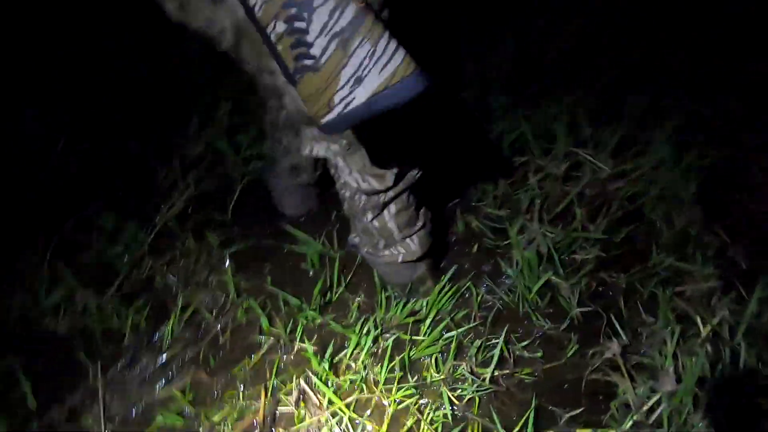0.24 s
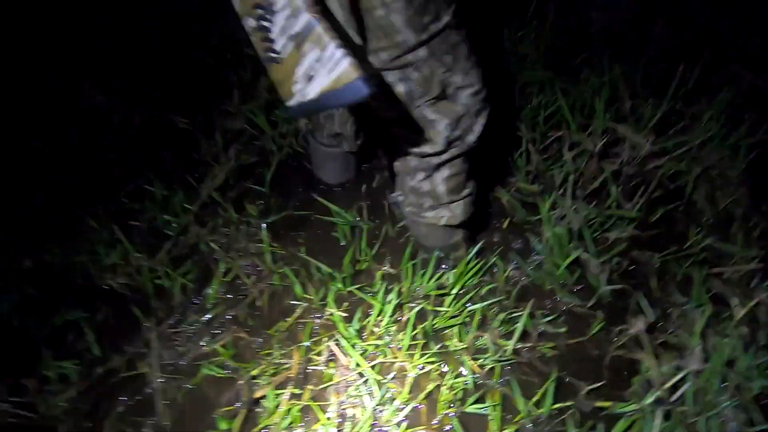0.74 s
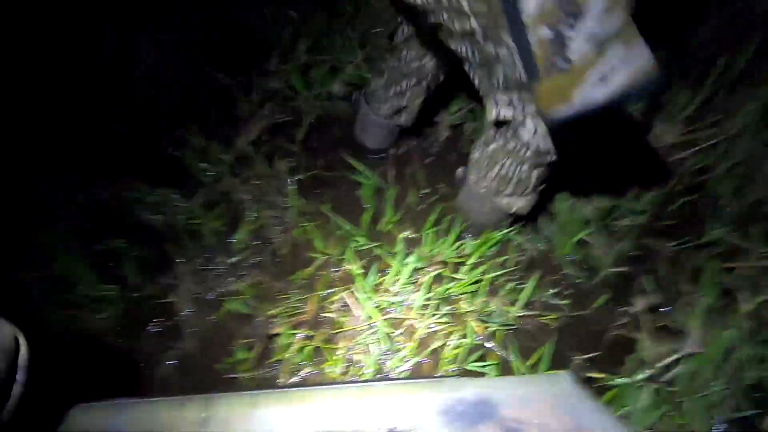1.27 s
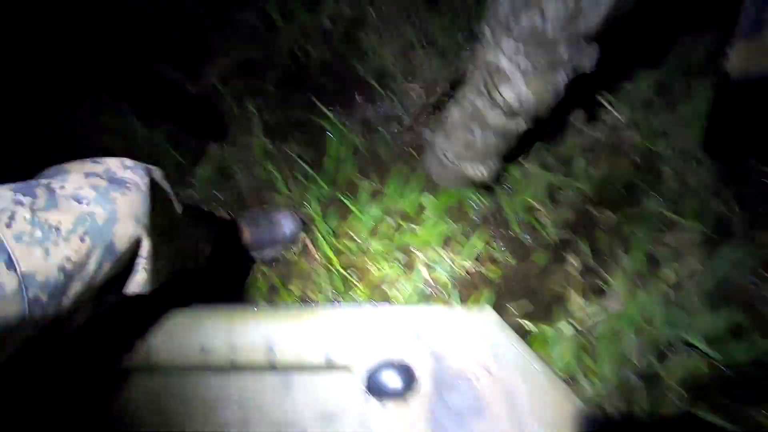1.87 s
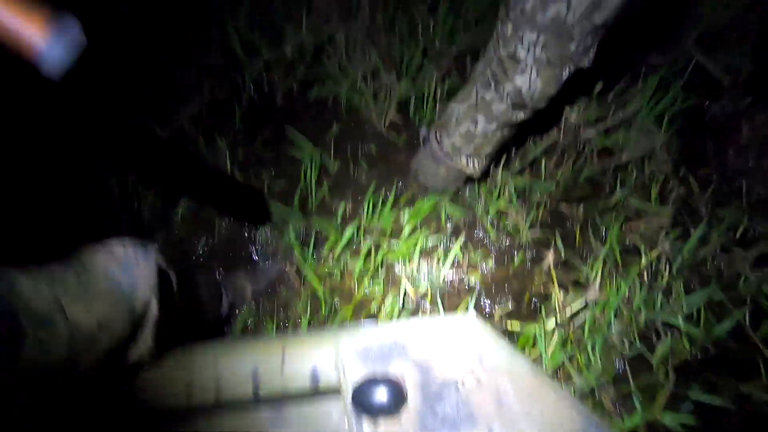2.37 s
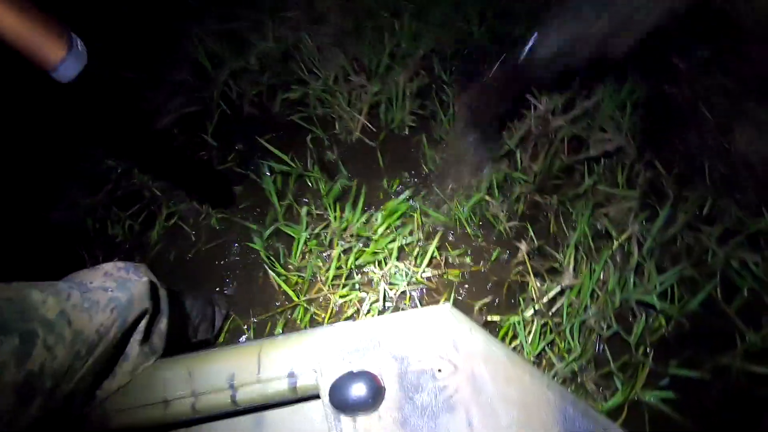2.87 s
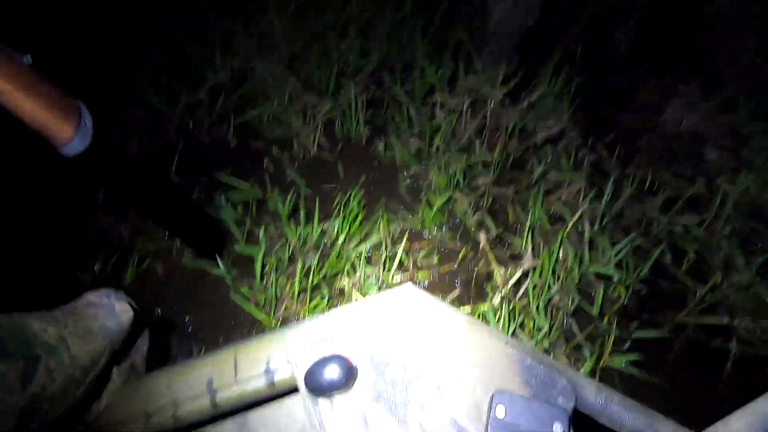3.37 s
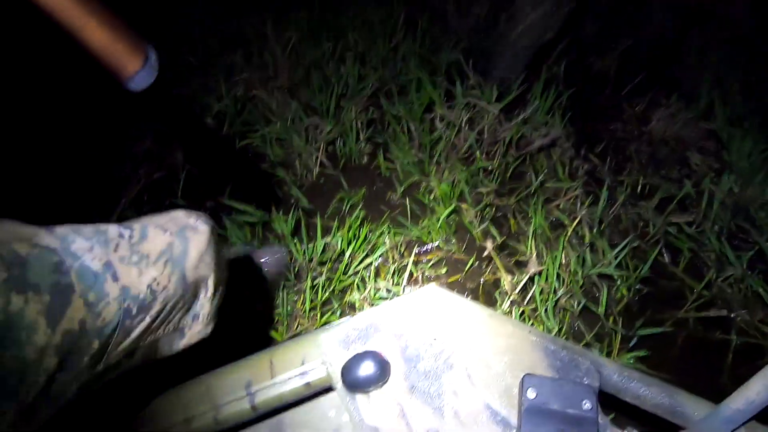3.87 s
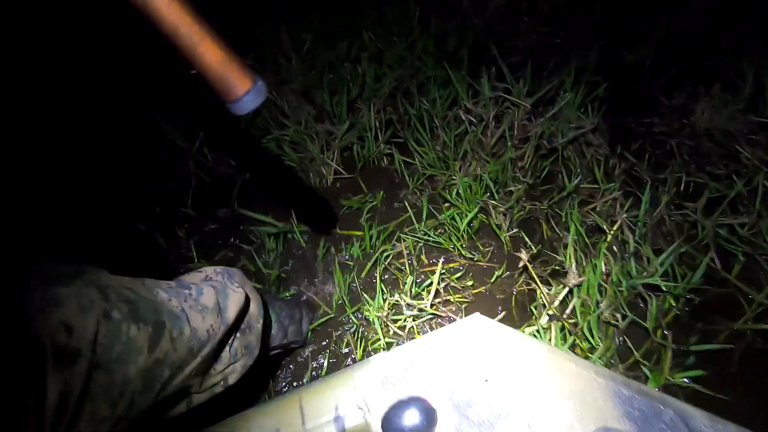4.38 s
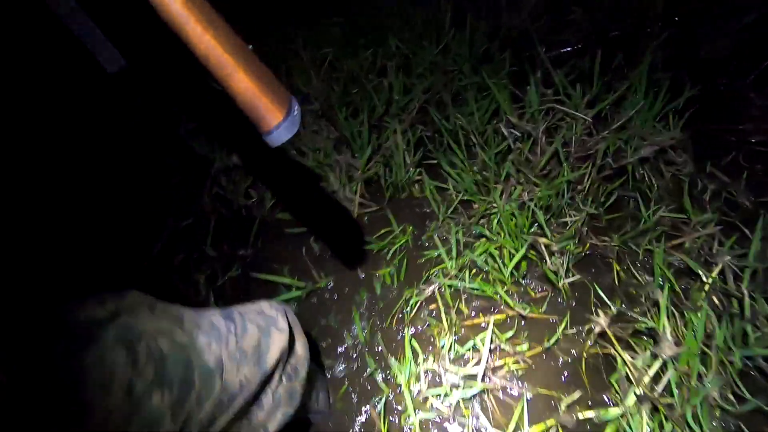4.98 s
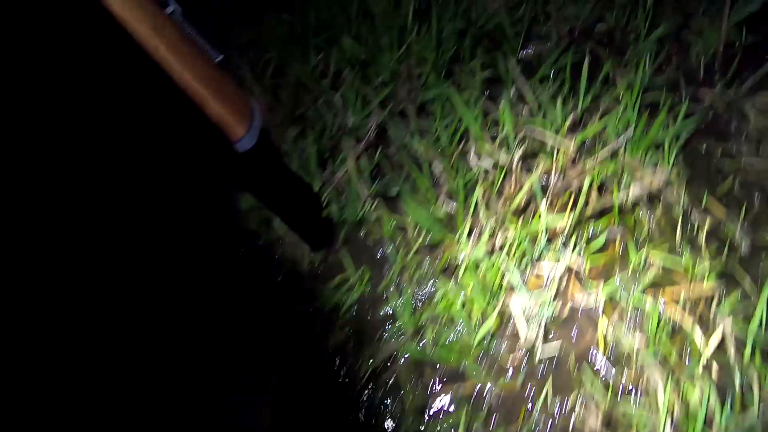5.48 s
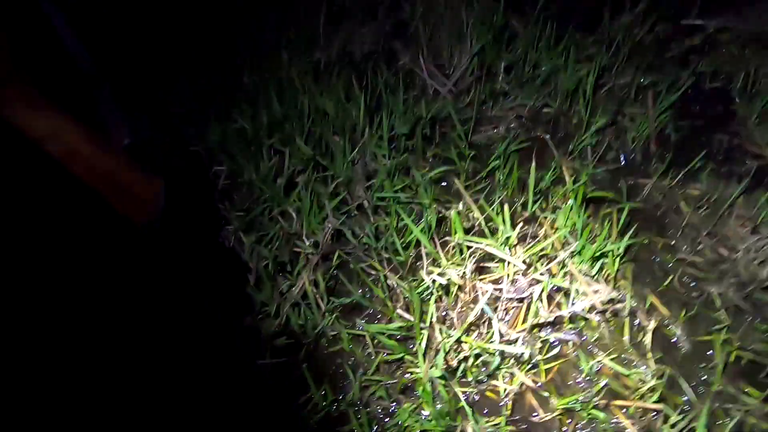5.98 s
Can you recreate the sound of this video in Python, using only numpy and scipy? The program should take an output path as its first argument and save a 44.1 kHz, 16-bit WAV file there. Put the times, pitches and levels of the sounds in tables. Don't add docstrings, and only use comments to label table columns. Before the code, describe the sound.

Close, slow wading through flooded grass outdoors at night. Quiet bubbling and a heavy muffled thud come first, then a crisp cluster of splashes around two seconds. More splashy steps follow at three and four seconds, with drips between. Later grass swishes along the boots in a wetter, brushier step. A body-worn microphone adds low rumble and knocks.

```python
import sys
import numpy as np
from scipy import signal
from scipy.fft import rfft, irfft
from scipy.io import wavfile
from scipy.ndimage import uniform_filter1d

SR = 44100
rng = np.random.default_rng(int(sys.argv[2]) if len(sys.argv) > 2 else 0)


def gain_from_decibels(decibels):
    exponent = np.asarray(decibels, float) / 20
    return 10 ** exponent


def to_wav(s):
    ch = np.atleast_2d(s).T
    pcm = np.round(np.clip(ch, -1, 1) * 32767)
    wavfile.write(sys.argv[1], SR, pcm.astype(np.int16))


N = 274743

# frequency in Hz, density in dB per Hz.
SPLASH_SPECTRUM = [(250, -28), (420, 3), (488, 2.5), (641, 2.5), (816, -3), (1140, -4), (2110, -5),
                   (2860, -4.5), (5990, -11.5), (10600, -16.5), (13500, -27.5), (15500, -32)]
# time of peak in seconds, peak in dB, rise in seconds,
# fall in seconds, depth (slosh against splash) in dB.
SURGES = [(0.24, -45, 4.9, 0.25, -18), (0.421, -43.5, 0.011, 0.079, 6), (0.85, -50.5, 1, 0.66, -4),
          (1.65, -42.5, 0.66, 0.066, -1), (1.72, -33.5, 0.1, 0.24, -10), (1.79, -33, 0.13, 0.18, -6),
          (1.89, -35.5, 0.078, 0.077, -34), (1.934, -32, 0.022, 0.08, -10), (1.98, -35.5, .1, 0.54, -17),
          (2.087, -31.5, 0.08, 0.031, -20), (2.13, -23, 0.04, 0.086, -12), (2.17, -27, 0.12, 0.055, -23),
          (2.225, -35, 0.08, 0.089, -5), (2.262, -31.5, 0.039, 0.044, -4),
          (2.308, -30.5, 0.056, 0.061, -16.5), (2.38, -31, 0.042, 0.061, -25),
          (2.43, -47, 0.074, 0.22, 1.5), (2.56, -47.5, 0.15, 0.3, -1), (2.7, -44, 0.3, 0.24, -17),
          (2.9, -35.5, 0.15, 0.2, -19), (2.98, -32, 0.16, 0.27, -11.5), (3.045, -34.5, 0.074, .06, -18),
          (3.17, -40.5, 0.25, 0.25, -37), (3.245, -39, 0.06, 0.18, -23), (3.309, -42, 0.021, 0.25, -3.5),
          (3.4, -29.5, 0.086, 0.21, -15), (3.54, -39.5, 0.099, 0.063, 13.5), (3.77, -43, 0.18, 0.085, -1.5),
          (3.86, -36.5, 0.036, 0.88, -6), (4.092, -25, 0.082, 0.22, -21), (4.15, -28.5, .06, 0.23, -21),
          (4.25, -42.5, 0.056, 0.31, 2.5), (4.36, -37, 0.22, 0.45, -7), (4.86, -43.5, 0.45, 0.54, -4.5),
          (5.55, -32, 0.19, 0.19, -6), (5.77, -39, 0.088, 0.11, -15), (6.07, -38, 0.2, 0.35, -6.5)]
# time of peak in seconds, peak in dB,
# rise in seconds, fall in seconds.
SWISHES = [
    (1.55, -46.5, 0.12, 0.24),
    (3.32, -36, 0.038, 0.16),
    (3.7, -55.5, 0.33, 0.49),
    (4.66, -44, 0.56, 0.37),
    (5.25, -52.5, 1, 0.28),
    (5.58, -40, 0.12, .2),
    (5.69, -37, 0.26, 0.064),
    (5.87, -43.5, 0.29, 0.72),
    (6.07, -65, 0.21, 0.48),
]
SPAN_DB = 20
SEEP_DB, SEEP_DEPTH_DB, SEEP_TOP_DB = -68.5, 2, -32
SPRAY_DB, DULLING = -20, 0.13
SWISH_TOP_DB = -13

# start in seconds, peak in dB, pitch in Hz, 60 dB decay in seconds.
PLOPS = [(0.153, -21.5, 432, 0.03), (0.243, -26.5, 650, 0.042), (0.416, -33, 438, 0.13),
         (0.25, -36, 1050, .04), (0.414, -38, 840, 0.08), (0.837, -23, 474, 0.025),
         (1.688, -34, 1260, 0.061), (1.706, -26.5, 980, 0.047), (1.99, -29.5, 1370, 0.044),
         (2.118, -31, 495, 0.038), (2.138, -30, 1200, 0.036), (2.193, -26.5, 572, 0.086),
         (2.262, -21, 410, 0.017), (2.295, -29, 434, 0.029), (2.506, -31, 390, 0.067),
         (2.856, -29, 1115, 0.021), (2.966, -22, 975, 0.024), (2.988, -23.5, 1000, 0.028),
         (3.773, -27.5, 720, 0.016), (3.495, -30, 640, 0.066), (4.023, -21, 644, 0.062),
         (4.249, -23.5, 1030, 0.039), (4.303, -15.5, 635, 0.021), (4.409, -25.5, 600, 0.027),
         (4.853, -30.5, 627, 0.042), (5.471, -29, 1340, 0.034), (5.496, -26, 984, 0.027),
         (5.524, -13.5, 600, 0.013), (5.644, -23.5, 556, 0.029), (5.794, -33, 630, 0.03),
         (6.052, -22, 580, 0.0071), (0.002, -31, 485, 0.051), (0.18, -26.5, 518, 0.061),
         (1.515, -34.5, 500, 0.088), (1.722, -24, 705, 0.026), (1.76, -27, 613, 0.073),
         (2.21, -24, 826, 0.016), (2.403, -30, 514, 0.027), (3.0, -33, 790, 0.035),
         (3.027, -31, 568, 0.045), (3.396, -20.5, 477, 0.021), (3.96, -28.5, 420, 0.066),
         (4.073, -25.5, 765, 0.036), (4.106, -22.5, 1060, 0.042), (4.325, -26, 606, 0.055),
         (4.836, -35, 690, 0.034), (5.575, -32, 690, 0.037)]
PLOP_RISE_S = 0.0019
# start in seconds, peak in dB, pitch in Hz, 60 dB decay in seconds.
SPLATS = [(1.385, -27.5, 2320, 0.084), (1.7059, -23.5, 1750, 0.056), (1.7399, -22, 1480, 0.011),
          (1.873, -20.5, 1520, 0.048), (1.929, -19.5, 3080, 0.03), (1.9622, -19, 2380, 0.057),
          (2.087, -28, 2700, 0.028), (2.1066, -16.5, 2600, 0.17), (2.26, -20, 2680, 0.035),
          (2.3052, -13.5, 2530, 0.03), (2.3664, -22.5, 2830, 0.13), (2.85, -20, 2800, .042),
          (2.8838, -13.5, 1950, 0.028), (2.9571, -22, 1160, 0.016), (2.9783, -11.5, 2470, 0.03),
          (3.3162, -16, 3440, 0.018), (3.3353, -18, 3700, 0.03), (3.3929, -23, 2600, 0.087),
          (3.7723, -23, 1330, 0.017), (3.8444, -43, 1280, 0.045), (3.928, -23, 2860, 0.021),
          (4.0497, -10.5, 3500, 0.037), (4.0987, -12, 2700, 0.028), (4.8531, -16, 1250, 0.0075),
          (5.474, -19, 1400, 0.026), (5.5528, -20.5, 1740, 0.067), (5.817, -24, 2650, 0.082),
          (5.8316, -19, 2840, 0.088)]
# start in seconds, peak in dB, pitch in Hz.
DRIPS = [(0.156, -31, 3300), (0.414, -30.5, 1370), (2.064, -28, 2830), (2.506, -26, 980),
         (2.574, -25, 2600), (1.146, -37, 3020), (3.1168, -25, 2950), (3.119, -21.5, 1530),
         (3.158, -26, 1530), (3.2053, -21.5, 3200), (3.271, -20.5, 3220), (3.981, -28, 2130),
         (4.3143, -21, 1960), (4.371, -29, 2050), (4.409, -25, 4140), (4.505, -24.5, 1250),
         (4.533, -23, 2930), (4.571, -33, 2500), (4.635, -28, 3420), (5.037, -25.5, 1580),
         (5.453, -22, 1500), (5.594, -21, 3560), (5.528, -24.5, 5000), (6.0208, -23.5, 1580),
         (6.167, -26, 2640)]
# start in seconds, peak in dB, pitch in Hz,
# 60 dB decay in seconds.
SPATTERS = [(0.86, -35, 1900, .04), (0.897, -48, 6500, .015), (1.374, -29, 660, 0.097),
            (1.764, -24, 1510, .04), (1.802, -20.5, 2800, 0.027), (1.84, -27, 3800, 0.017),
            (1.8916, -28, 5130, 0.019), (1.977, -27, 2870, 0.021), (1.9895, -22.5, 1600, .04),
            (2.007, -30, 1800, 0.017), (2.026, -30, 7440, 0.026), (2.1177, -10.5, 2820, 0.14),
            (2.142, -17, 1930, 0.028), (2.181, -17, 2200, .03), (2.225, -23, 3670, .03),
            (2.28, -32, 9900, 0.023), (2.3526, -42, 7810, .015), (2.556, -43, 10500, .015),
            (2.7985, -35, 6350, .012), (2.8208, -22.5, 2540, 0.044), (2.827, -40, 8800, .015),
            (2.885, -30, 1980, 0.018), (2.897, -16, 1800, 0.035), (3.011, -25, 1470, 0.027),
            (3.052, -19, 2580, 0.011), (3.174, -20, 1560, 0.037), (3.406, -14.5, 3100, 0.024),
            (3.446, -25, 2970, .02), (3.85, -23.5, 1270, 0.046), (4.034, -18, 1190, 0.076),
            (4.0706, -33, 2200, 0.031), (4.141, -18, 3350, 0.043), (4.247, -26, 6500, .012),
            (4.351, -20.5, 1510, 0.036), (4.4418, -30.5, 6890, 0.016), (4.468, -26.5, 1110, .02),
            (4.499, -25, 4660, 0.018), (4.604, -31, 2500, 0.012), (4.836, -30, 1470, 0.031),
            (4.8858, -26, 4140, 0.029), (5.055, -31, 5500, .02), (5.769, -31, 4760, .03),
            (5.872, -27, 3280, 0.011), (6.081, -27, 3900, 0.018), (6.1439, -52, 5240, .02),
            (0.529, -41, 1210, 0.022), (1.334, -37, 497, 0.03), (4.534, -34, 10900, .015),
            (1.01, -45, 606, 0.034)]
SPLAT_WIDTH, DRIP_WIDTH, SPATTER_WIDTH = 0.83, 0.98, 0.62
DRIP_T60_S = 0.036
TICK_DB, TICK_S = -24.5, 0.00042
LOW_DULL_DB = 2.5
# start in seconds, peak in dB, pitch in Hz.
SNAPS = [(0.2489, -32, 1680), (1.4874, -34, 2570), (1.7069, -26, 1770), (1.741, -19, 1600),
         (1.7534, -33, 3300), (1.7981, -27, 1600), (2.0103, -32, 2540), (2.067, -28, 2200),
         (2.087, -29, 2880), (2.1063, -20, 2150), (2.2959, -25.5, 1100), (2.6893, -28.5, 2970),
         (2.8822, -25, 1940), (2.9801, -20, 2240), (3.01, -33, 2750), (3.1182, -28.5, 2800),
         (3.3094, -24, 3400), (3.7736, -25, 1590), (4.0034, -24, 2300), (4.5725, -25, 2370),
         (5.6295, -39, 3230), (1.9288, -27, 3000), (3.9303, -24, 2840), (4.4191, -25, 1100),
         (4.6363, -30, 2750)]
SNAP_RISE_S, SNAP_T60_S = 0.0001, 0.004

# start in seconds, length in seconds,
# first pitch in Hz, last pitch in Hz, level in dB.
SQUEAKS = [(0.011, 0.0037, 1160, 1170, -32), (.012, 0.0073, 2230, 2320, -38),
           (0.082, 0.53, 3090, 2904, -55), (0.413, 0.0073, 3800, 3700, -38.5),
           (0.553, 0.0069, 5670, 5640, -48.5), (1.27, 0.16, 2685, 2650, -52),
           (1.518, .14, 2586, 2760, -50.5), (3.634, 0.142, 2060, 1940, -51), (3.839, 0.012, 680, 1940, -37),
           (4.974, 0.048, 780, 2940, -47.5), (5.371, 0.011, 3840, 3580, -41),
           (5.59, 0.056, 617, 960, -41.5), (5.725, 0.026, 900, 1400, -47), (5.937, 0.023, 1365, 2680, -41),
           (5.947, 0.026, 910, 1320, -49), (6.062, 0.057, 2240, 2260, -42)]
WAVER = 0.16

# start in seconds, peak in dB,
# low note in Hz, upper note in dB against it, 60 dB decay in seconds.
KNOCKS = [(0.175, -28.5, 182, 3, 0.058), (0.246, -11, 162.2, -7, 0.19), (0.417, -38, 164, -4.5, 0.16),
          (0.482, -28, 188, -28, 0.064), (0.581, -33, 186.7, -14, 0.53), (0.61, -25, 175, -11, 0.14),
          (1.669, -21, 150.7, -15, 0.185), (2.414, -42.5, 203, 5, 0.19), (3.445, -13.5, 165, -30, 0.057),
          (3.557, -13.5, 155.5, -17, 0.16), (3.777, -44.5, 149, 10, 0.068), (4.63, -31, 94.5, -4, 0.051),
          (4.802, -22.5, 117.5, -12.5, 0.17), (5.399, -32.5, 122, -4.5, 0.82), (5.653, -18, 167.5, -3, 0.2),
          (5.794, -16.5, 106, -5.5, 0.11), (6.109, -28.5, 151, -6, 0.068), (6.156, -17.5, 100, -26, 0.035)]
# start in seconds, peak in dB, pitch in Hz, 60 dB decay in seconds.
THUDS = [(0.304, -18.5, 162.5, 0.11), (0.526, -32, 200, 0.063), (0.76, -21, 187, 0.033),
         (0.837, -0.5, 157, 0.14), (0.882, -11, 129.5, 0.12), (0.979, -23, 88.5, 0.048),
         (1.005, -19.5, 163, 0.15), (1.031, -16, 105, 0.067), (1.765, -27.5, 95, 0.071),
         (2.502, -30, 109.4, 0.24), (3.418, -12, 118, 0.093), (4.667, -25, 96.9, 0.043),
         (4.712, -30.5, 103, 0.16), (5.587, -21, 91.5, 0.1), (5.672, -11.5, 124, 0.25),
         (5.825, -24, 254, 0.17), (5.748, -20.5, 112.7, 0.48), (0.133, -30, 240, .06),
         (1.515, -37, 210, 0.11), (1.59, -34, 181, 0.13), (1.932, -32.5, 170, 0.072),
         (2.125, -33, 199, 0.11), (2.59, -37, 235, 0.045), (2.703, -42, 190, 0.16), (2.854, -36, 98, 0.099),
         (1.155, -39, 128, 0.14), (5.005, -29.5, 100, .1), (5.27, -32, 111, 0.16), (4.076, -32, 222, 0.12),
         (4.149, -33, 230, 0.07), (4.33, -30.5, 171, 0.045), (4.809, -29, 285, 0.14),
         (6.17, -32, 280, 0.058), (5.657, -22.5, 328, 0.065), (5.796, -20.5, 346, 0.055),
         (1.579, -35.5, 337, .08)]
# start in seconds, peak in dB, low note in Hz, upper note in dB against it,
# 60 dB decay in seconds.
SHOVES = [
    (0.817, -14.5, 143, -17, 0.26),
    (1.375, -24.5, 159.8, -7, 0.17),
    (3.509, -16, 161.6, -41, 0.2),
    (5.799, -20, 217.5, 5, 0.096),
    (5.905, -27, 224, 0, 0.2),
]
KNOCK_RISE_S, THUD_RISE_S, SHOVE_RISE_S = 0.0017, 0.0031, 0.021
THUD_UPPER_DB = -23
UPPER_HZ, THIRD_HZ = 255, 346.4
# frequency in Hz, density in dB per Hz.
RATTLE_SPECTRUM = [(200, -22), (330, 1.5), (650, -4.5), (1300, -19.5), (3000, -33), (12000, -66)]
RATTLE_RISE_S, RATTLE_T60_S = 0.0044, 0.16
# time in seconds, level in dB.
HANDLING = [(0.0, -40), (0.57, -50), (1.18, -56), (1.39, -39.5), (1.49, -47), (1.68, -43.5), (2.5, -49),
            (2.67, -48), (3.19, -56), (3.54, -31), (3.66, -48.5), (4.25, -51.5), (4.53, -57.5),
            (4.84, -45.5), (5.18, -49), (5.4, -42), (5.85, -34.5), (6.23, -42.5)]
# frequency in Hz, width in Hz, level in dB.
HOUSING_MODES = [(122, 67, -2.5), (164, 28, 2), (251.3, 130, -3.5), (363.5, 27, -7.5), (504, 210, -14.5)]
# time of peak in seconds, peak in dB, rise in seconds.
BUFFETS = [(0.0, -43, .3), (0.21, -34.5, 0.46), (0.85, -33, 0.57), (1.0, -35, .15), (1.39, -53, 0.44),
           (1.68, -32.5, 0.1), (1.95, -38.5, 0.98), (2.2, -41.5, 0.1), (2.53, -38, 0.37),
           (2.71, -33, 0.045), (2.95, -37.5, 0.45), (3.3, -34, 0.079), (3.5, -48, .3), (3.748, -39, 0.039),
           (4.34, -38, 0.3), (4.67, -35, 0.044), (4.84, -41, 0.63), (5.05, -51, 0.35), (5.33, -42, 0.76),
           (5.6, -32.5, 0.091), (5.85, -44, 0.33), (6.03, -37, 0.33), (6.18, -39, 0.26)]
BUFFET_FALL_S, CALM_DB = 0.24, -68
# frequency in Hz, density in dB per Hz.
RUMBLE_SPECTRUM = [(10, -10), (25, 9.5), (50, 8), (80, 3), (110, -58), (200, -71)]

# frequency in Hz, density in dB per Hz.
NIGHT_SPECTRUM = [(180, -43), (300, -7), (600, -0.5), (1000, -14.5), (3000, -14), (4300, -6), (6000, -25),
                  (11400, -30.5), (14000, -62.5)]
NIGHT_DB = -60.5
# frequency in Hz, width in Hz, level in dB.
CAVITY_MODES = [(635, 60, -15.5), (1710, 24, -7.5), (2800, 150, -17.5), (3620, 65, -16), (8160, 220, -4)]
TOP_HZ = 14800


def wading():
    hz, t, z = signal.stft(water_texture(), SR, nperseg=512)
    patches = uniform_filter1d(rng.standard_normal(z.T.shape), size=5, axis=0)
    patches = evened(uniform_filter1d(patches, size=9, axis=1)).T

    s, db, rise, fall, deep_db = np.transpose(SURGES)
    water_db = swells(t, SEEP_DB, s, db, rise, fall)
    blades_db = swells(t, 2 * SEEP_DB, *np.transpose(SWISHES))
    force_db = 10 * np.log10(gain_from_decibels(2 * water_db) + gain_from_decibels(2 * blades_db))
    depth_db = swells(t, SEEP_DB + SEEP_DEPTH_DB, s, db + deep_db, rise, fall) - force_db
    spray_db = swells(t, SEEP_DB + SEEP_TOP_DB, s, db + SPRAY_DB - DULLING * deep_db, rise, fall)
    bright_db = 10 * np.log10(gain_from_decibels(2 * spray_db) + gain_from_decibels(2 * (blades_db + SWISH_TOP_DB))) - force_db

    top = np.clip(np.log2(hz / 3500 + 1e-9) / 0.79, 0, 1.5)[:, None]
    bottom = np.clip(np.log2(1300 / (hz + 1)) / 1.47, 0, 1)[:, None]
    z = z * gain_from_decibels(top * (bright_db + 11.0) + bottom * (depth_db + 1.0) + 1.8 * patches)
    force = gain_from_decibels(np.interp(np.arange(N) / SR, t, force_db))
    return force * signal.istft(z, SR, nperseg=512)[1][:N]


def water_texture():
    gusts = gain_from_decibels(1.0 * lumps(0.024) + 1.7 * lumps(0.0035))
    raw = 0.31 * rng.standard_normal(N)
    raw += 0.21 * bubbles(4000, 1.6, 10.1, 14490, 0.8)
    raw += 0.14 * bubbles(1500, 4.0, 1.5, 14000, 0.64)
    raw += 0.087 * bubbles(450, 3.2, 29.4, 5525, 3.3)
    return coloured(raw * gusts, SPLASH_SPECTRUM)


def bubbles(per_s, spread_db, cycles, top_hz, rise, count=22):
    size = gain_from_decibels(spread_db * np.minimum(rng.exponential(1, N), 2.8))
    size = size * (rng.random(N) < per_s / SR)
    kind, out = rng.integers(0, count, N), np.zeros(N)
    for k, hz in enumerate(np.geomspace(350, top_hz, count)):
        grain = ring(hz, rise / hz, 2.0 * cycles / hz, 0.094 * hz / cycles)
        grain = grain[:int(2 * cycles * SR / hz)]
        grain = grain / np.linalg.norm(grain) * np.sqrt(hz)
        out += signal.oaconvolve(size * (kind == k), grain)[:N]
    return evened(out)


def drops():
    splats = [(*row, SPLAT_WIDTH) for row in SPLATS]
    drips = [(*row, DRIP_T60_S, DRIP_WIDTH) for row in DRIPS]
    out = bursts(splats + drips)
    for s, db, hz, t60 in PLOPS:
        add(out, s, gain_from_decibels(db - 5.5) * ring(hz, PLOP_RISE_S, t60, 1.0))
    for s, db, hz in SNAPS:
        add(out, s, gain_from_decibels(db) * ring(hz, SNAP_RISE_S, SNAP_T60_S))
    return out


def spatters():
    return bursts([(*row, SPATTER_WIDTH) for row in SPATTERS])


def bursts(thrown):
    out, spray = np.zeros(N), np.zeros(N)
    noise = rng.standard_normal((len(thrown), 4096))
    for (s, db, hz, t60, width), burst in zip(thrown, noise):
        t = np.arange(len(burst)) / SR
        fade = (1 - np.exp(-t / 0.00055)) * gain_from_decibels(-60 * t / max(t60, 0.004))
        crackle = burst * abs(burst) * fade
        note = modal(crackle, [(hz, width * hz, 0)], order=3)
        add(out, s, gain_from_decibels(db - 7.5) * note / abs(note).max())
        fine_db = db + LOW_DULL_DB * min(np.log2(hz / 3000), 0)
        add(spray, s, gain_from_decibels(fine_db - 24.5) * fade + gain_from_decibels(fine_db + TICK_DB) * np.exp(-t / TICK_S))
    return out + spray * coloured(rng.standard_normal(N), SPLASH_SPECTRUM)


def squeaks():
    out, waver = np.zeros(N), lumps(0.0015)
    swell = gain_from_decibels(1.5 * lumps(0.004))
    for s, length, from_hz, to_hz, db in SQUEAKS:
        hz = np.geomspace(from_hz, to_hz, int(length * SR))
        hz = hz * (1 + WAVER * np.sqrt(length) * waver[round(s * SR):][:len(hz)])
        note = np.sin(2 * np.pi * np.cumsum(hz) / SR)
        add(out, s, gain_from_decibels(db) * note * signal.windows.tukey(len(hz), 0.6))
    return out * swell


def jolts():
    out, rattle = np.zeros(N), np.zeros(N)
    blows = [(*row, KNOCK_RISE_S) for row in KNOCKS] + [(*row, SHOVE_RISE_S) for row in SHOVES]
    blows += [(s, db, hz, THUD_UPPER_DB, t60, THUD_RISE_S) for s, db, hz, t60 in THUDS]
    t = np.arange(SR // 4) / SR
    rattle_shape = gain_from_decibels(-60 * t / RATTLE_T60_S) * np.minimum(t / RATTLE_RISE_S, 1)
    for s, db, hz, upper_db, t60, rise in blows:
        add(out, s, gain_from_decibels(db - 5.0) * ring(hz, rise, t60))
        add(out, s, gain_from_decibels(db + upper_db + 3.0) * ring(UPPER_HZ, 2.0 * rise, 0.34 * t60))
        add(out, s, gain_from_decibels(db + upper_db - 11.0) * ring(THIRD_HZ, 0.41 * rise, 0.4 * t60))
        add(rattle, s, gain_from_decibels(db + upper_db - 16.0) * rattle_shape)
    return out + rattle * coloured(rng.standard_normal(N), RATTLE_SPECTRUM)


def handling():
    shake_db = np.interp(np.arange(N) / SR, *np.transpose(HANDLING))
    force = rng.standard_normal(N) * gain_from_decibels(4.9 * lumps(0.02))
    return gain_from_decibels(shake_db) * evened(modal(force, HOUSING_MODES, order=2))


def rumble():
    slow = np.arange(0, N + 256, 256) / SR
    buffet_db = swells(slow, CALM_DB, *np.transpose(BUFFETS), BUFFET_FALL_S)
    rumble_db = np.interp(np.arange(N) / SR, slow, buffet_db)
    noise = coloured(rng.standard_normal(N) * gain_from_decibels(2.3 * lumps(0.055)), RUMBLE_SPECTRUM)
    return gain_from_decibels(rumble_db - 1.5) * noise


def night():
    return gain_from_decibels(NIGHT_DB) * coloured(rng.standard_normal(N), NIGHT_SPECTRUM)


def ring(hz, rise, t60, glide=0.0):
    t = np.arange(int(0.3 * SR)) / SR
    shape = (1 - np.exp(-t / max(rise, 1e-4))) ** 2 * gain_from_decibels(-60 * t / max(t60, 0.002))
    return shape / shape.max() * np.sin(2 * np.pi * hz * (t + glide * t ** 2))


def modal(x, modes, order=1):
    f = np.fft.rfftfreq(len(x), 1 / SR)
    response = sum(gain_from_decibels(db) / (1 + 2j * (f - hz) / w) ** order for hz, w, db in modes)
    return irfft(rfft(x) * response, len(x))


def swells(t, rest_db, s, db, rise, fall):
    late = t[:, None] - s
    before, after = -late / np.maximum(rise, 0.005), late / np.maximum(fall, 0.005)
    peaks = db - SPAN_DB * np.where(late < 0, before, after)
    return 10 * np.log10(gain_from_decibels(2 * rest_db) + gain_from_decibels(2 * peaks).sum(1))


def coloured(x, points):
    f, db = np.transpose(points)
    hz = np.fft.rfftfreq(len(x), 1 / SR)
    gain = gain_from_decibels(np.interp(np.log(hz + 1), np.log(f + 1), db))
    return evened(irfft(rfft(x) * gain, len(x)))


def lumps(width_s):
    size = max(int(width_s * SR), 2)
    return evened(uniform_filter1d(uniform_filter1d(rng.standard_normal(N), size), size))


def evened(x):
    return x / np.sqrt(np.mean(x ** 2) + 1e-20)


def add(mix, s, sound):
    part = mix[round(s * SR):][:len(sound)]
    part += sound[:len(part)]


def scene():
    airborne = wading() + drops() + spatters() + night()
    close = squeaks() + jolts() + handling() + rumble()
    return (airborne + modal(airborne, CAVITY_MODES) + close)[None]


def band_limit(x):
    return signal.sosfilt(signal.butter(12, 15710, fs=SR, output="sos"), x)


def record(dry):
    low_pass = signal.butter(10, TOP_HZ, fs=SR, output="sos")
    limited = signal.sosfilt(low_pass, dry)
    return band_limit(limited)


dry = scene()
out = record(dry)
to_wav(out)
```